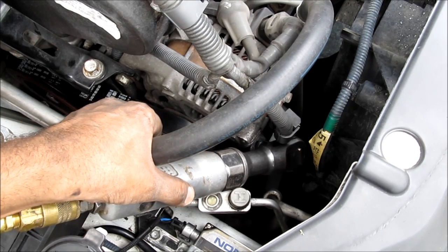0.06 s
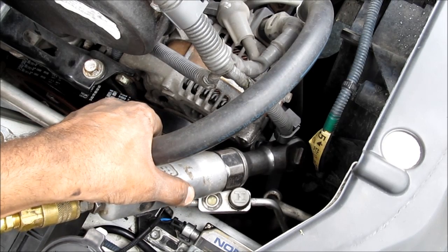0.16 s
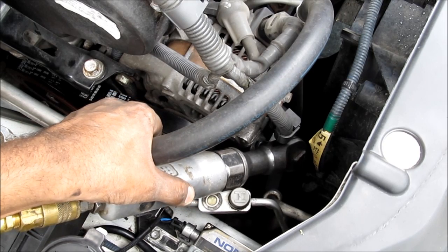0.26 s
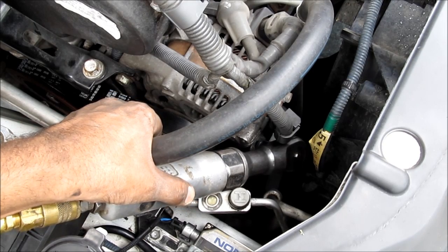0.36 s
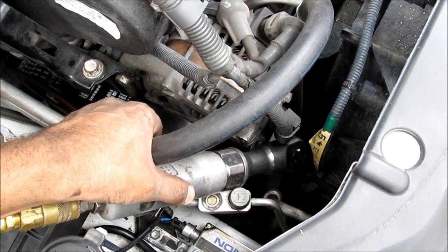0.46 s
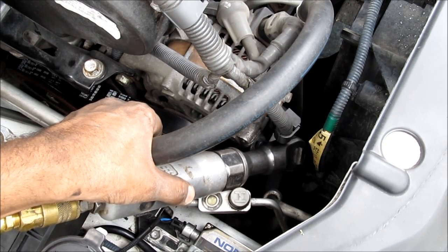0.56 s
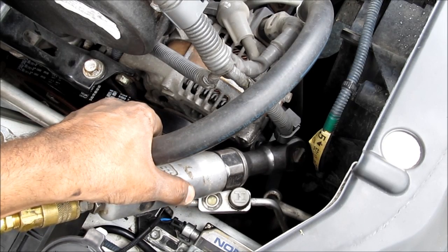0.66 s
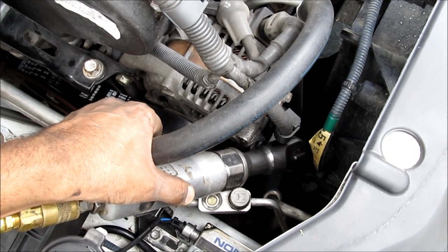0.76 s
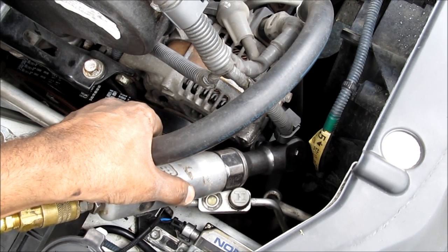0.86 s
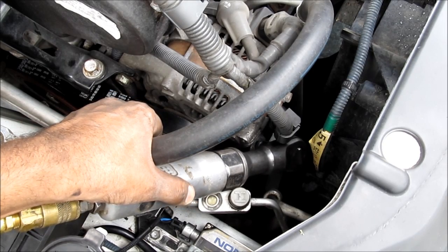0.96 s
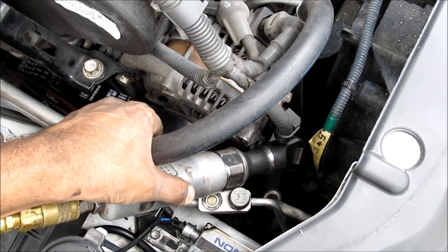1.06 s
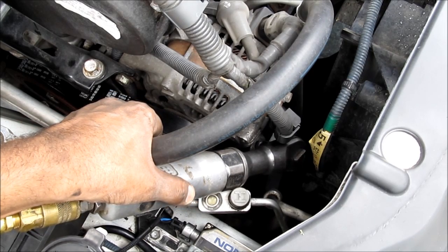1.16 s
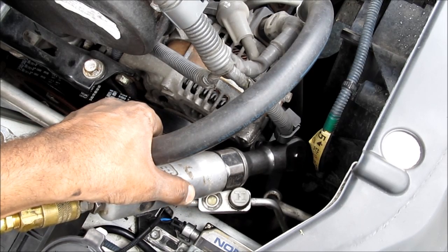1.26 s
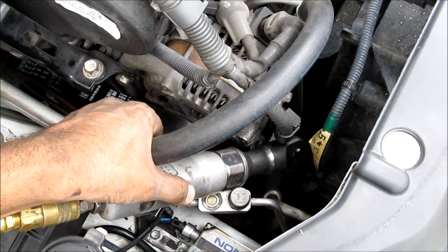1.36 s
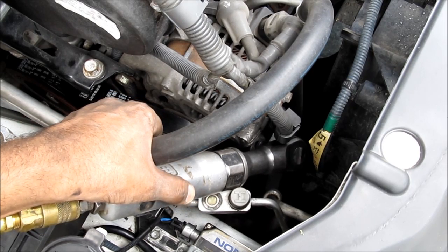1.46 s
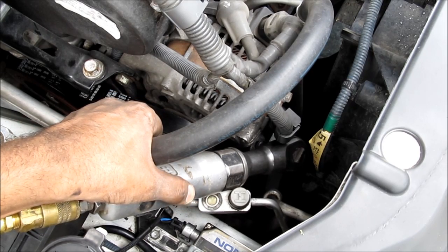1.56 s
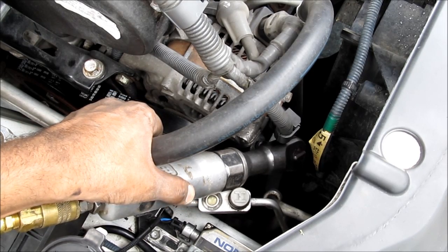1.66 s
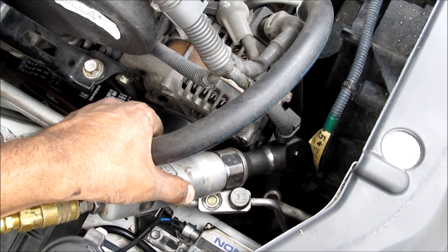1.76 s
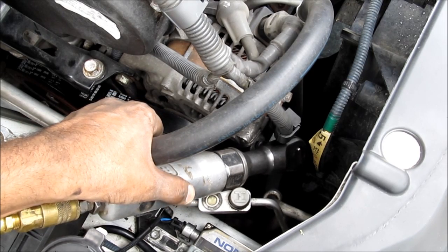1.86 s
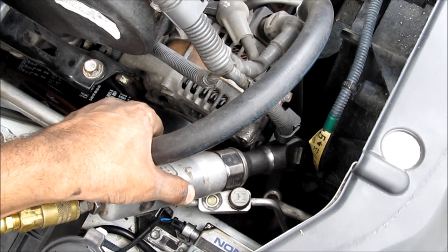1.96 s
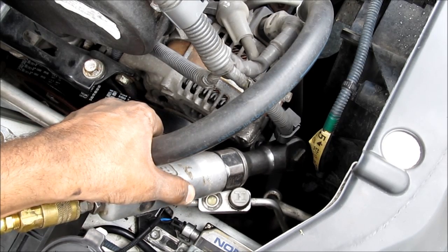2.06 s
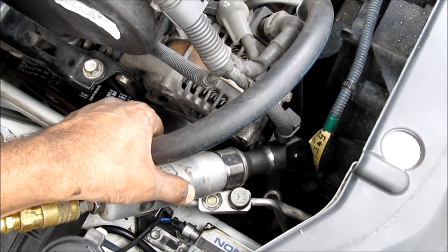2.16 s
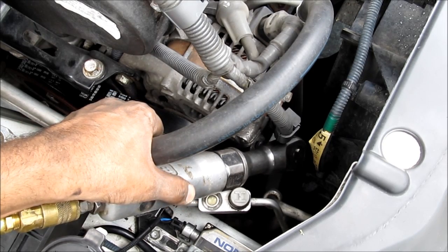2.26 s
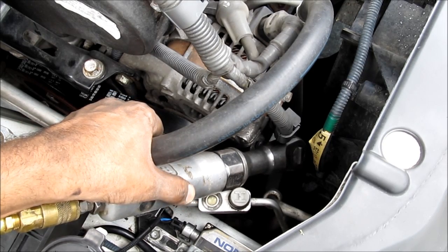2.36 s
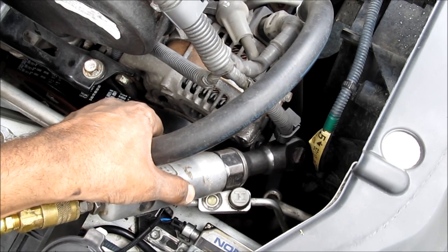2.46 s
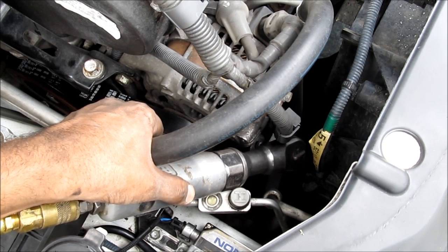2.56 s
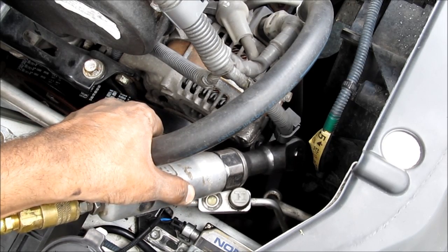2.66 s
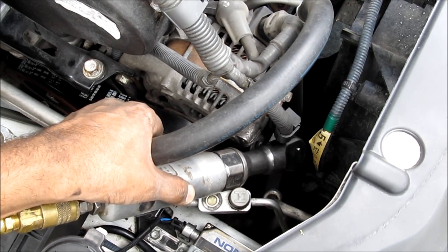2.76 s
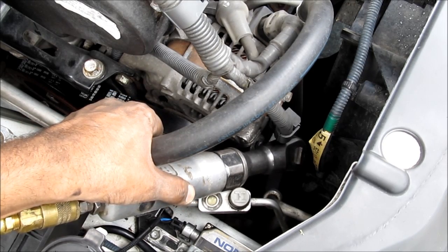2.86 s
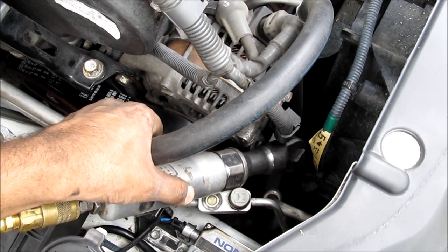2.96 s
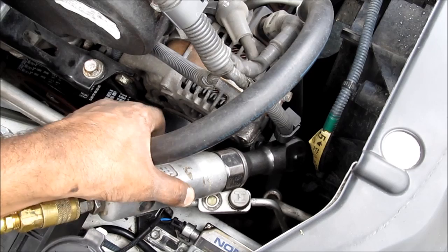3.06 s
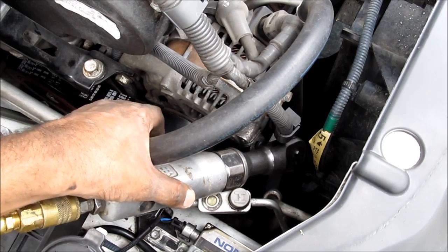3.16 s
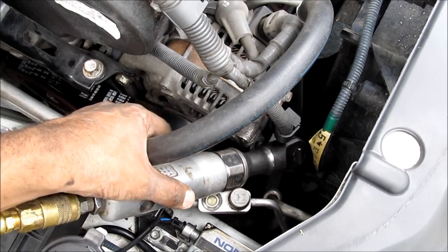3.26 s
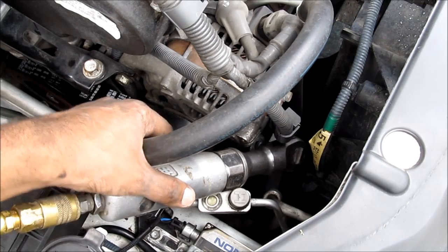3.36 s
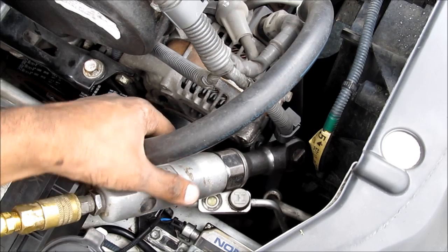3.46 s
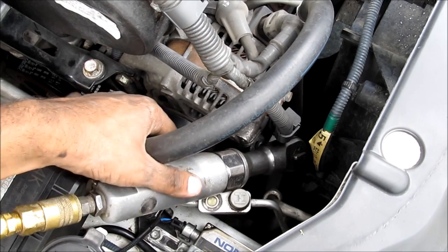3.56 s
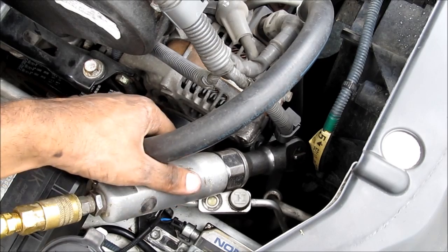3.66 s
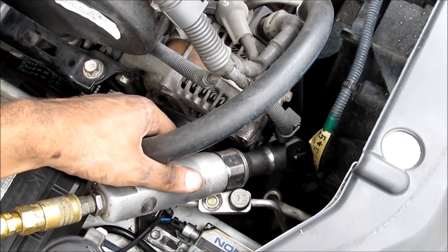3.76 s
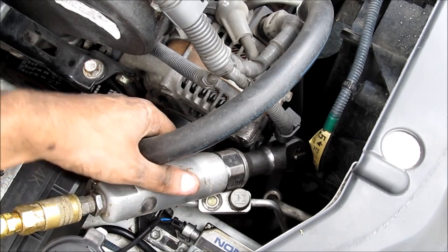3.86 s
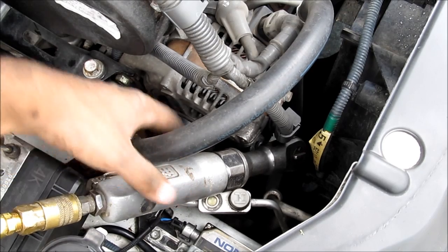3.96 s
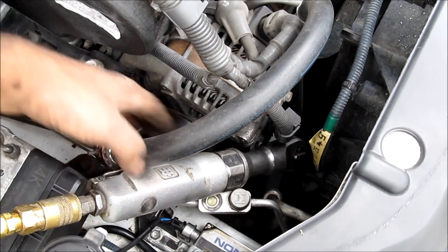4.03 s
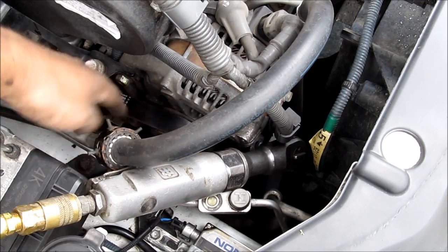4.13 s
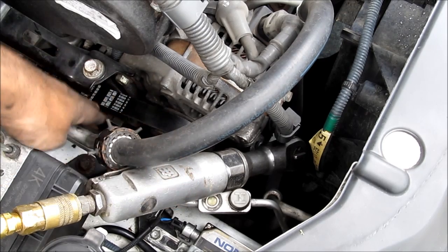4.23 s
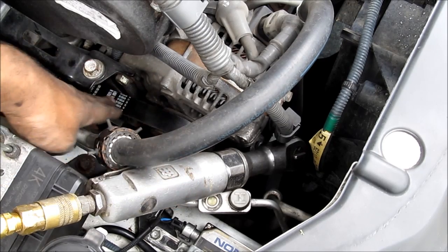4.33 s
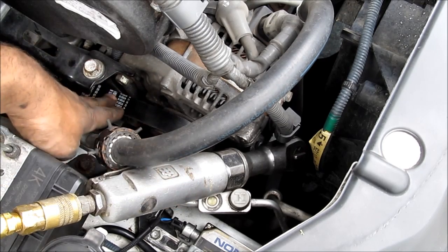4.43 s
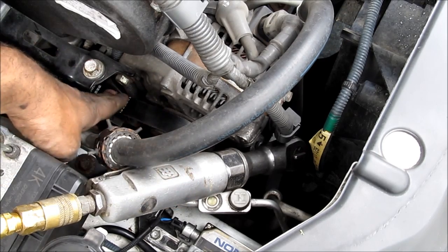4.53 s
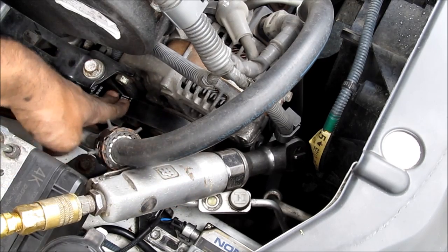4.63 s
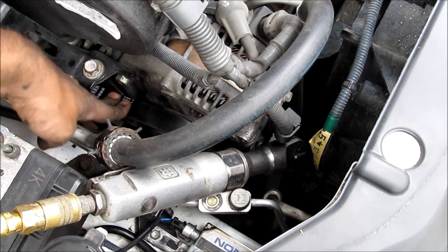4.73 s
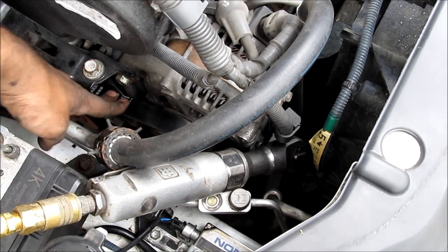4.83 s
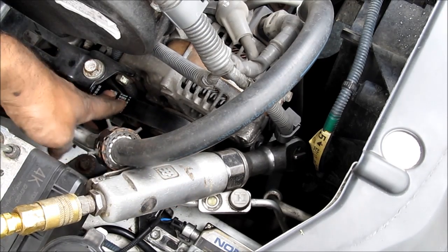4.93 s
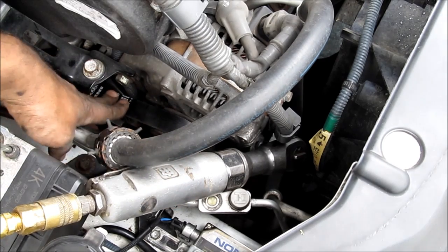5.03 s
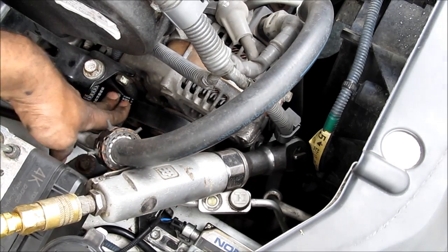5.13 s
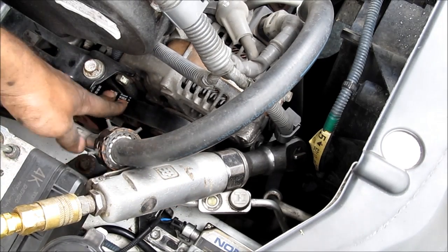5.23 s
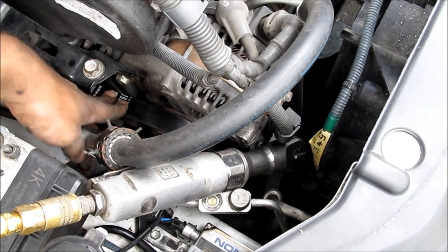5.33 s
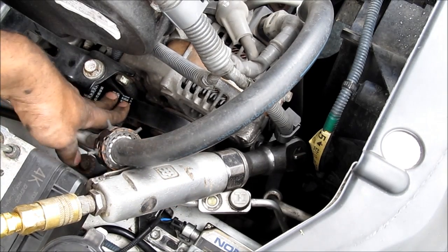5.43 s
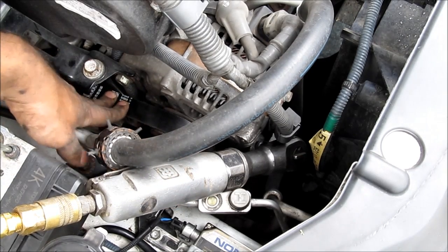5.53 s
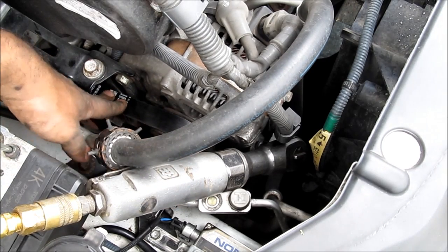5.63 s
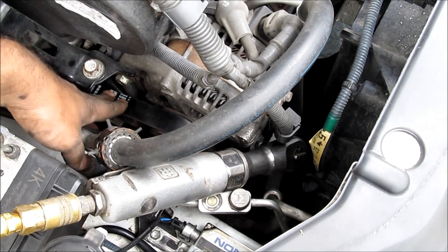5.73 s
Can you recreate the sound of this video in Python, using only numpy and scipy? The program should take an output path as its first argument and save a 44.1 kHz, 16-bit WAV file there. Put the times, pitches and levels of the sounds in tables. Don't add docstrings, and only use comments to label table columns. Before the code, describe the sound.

From 0 to about 3.4 s an air ratchet runs at full speed very near a small stereo microphone in an engine bay: a loud, bright, wide hiss of exhaust air, a steady whine around 1 kHz with higher overtones, and a rapid rattling chatter of gear and pawl. The pitch settles slightly at the start and sags a little from 3.1 s. At about 3.45 s the air is cut; the whine plunges into a short hollow whoop near 3.55 s, stalls by 3.6 s, and metal parts clatter until 3.7 s. Then it is very quiet, with low distant traffic and air gradually rising. A faint cricket chirps at 3.85, 4.2, 4.5, 5.05, 5.3 and 5.7 s, growing louder, among thin wavering whistles. Small ticks come at 3.8 and 4.2 s, a dry hand brush at 4.9-5.0 s, and knocks at 5.2 and 5.4 s.

```python
import sys
import numpy as np
from scipy import signal
from scipy.fft import rfft, irfft, next_fast_len
from scipy.io import wavfile
from scipy.ndimage import uniform_filter1d

SR = 44100
rng = np.random.default_rng(int(sys.argv[2]) if len(sys.argv) > 2 else 0)


def bounce(signal):
    frames = np.transpose(np.atleast_2d(signal))
    limited = np.clip(frames, -1, 1)
    pcm = np.round(limited * 32767).astype(np.int16)
    wavfile.write(sys.argv[1], SR, pcm)


def voltage_ratio(level):
    return 10 ** (np.asarray(level, float) / 20)


N = 255339
T = np.arange(N) / SR
HZ = np.fft.rfftfreq(512, 1 / SR)
FRAME_S = np.arange(N // 128 + 5) * 128 / SR


def evened(x):
    return x / np.sqrt(np.mean(x ** 2) + 1e-20)


def read(points, hz):
    f, value = np.transpose(points)
    return np.interp(np.log(hz + 1), np.log(f + 1), value)


def columns(rows, t):
    s, *rest = np.transpose(rows)
    return [np.interp(t, s, c) for c in rest]


def ramp(t, start, length):
    return np.clip((t - start) / length, 0, 1)


def bumps(peaks, hz):
    return sum(db / (1 + (2 * (hz - f) / width) ** 2) for f, width, db in peaks)


def coloured(x, db_at):
    size = next_fast_len(N)
    gain = voltage_ratio(db_at(np.fft.rfftfreq(size, 1 / SR)))
    return irfft(rfft(x, size) * gain, size)[:, :N]


def resonate(x, hz, width):
    pole = np.exp((2j * np.pi * hz - np.pi * width) / SR)
    return 2 * signal.lfilter([1 - abs(pole)], [1, -pole], x + 1e-18).real


def drift(rate, t):
    s = t[::1 + len(t) // 8000]
    rates = np.geomspace(.03, 1, 24) * rate
    waves = sum(np.sin(2 * np.pi * (f * s + rng.random())) / f ** .3 for f in rates)
    return np.interp(t, s, evened(waves))


def panned(x, left_db):
    return x * voltage_ratio(np.array([[left_db / 2], [-left_db / 2]]))


def pair(count, same):
    a, b = rng.standard_normal((count, 2)).T
    return np.array([a, same * a + np.sqrt(1 - np.clip(same, 0, 1) ** 2) * b])


def noise(db, same, patchy_db, left_db=0, lead=0):
    a, b, c, d, patches = rng.standard_normal((len(FRAME_S), len(HZ), 5)).T
    patches = uniform_filter1d(patches, size=6, axis=0)
    patches = evened(uniform_filter1d(patches, size=24, axis=1))
    same = np.clip(read(same, HZ), -1, 1)[:, None]
    left = a + 1j * b
    right = same * left * np.exp(-1j * lead) + np.sqrt(1 - same ** 2) * (c + 1j * d)
    z = np.array([left * voltage_ratio(left_db / 2), right / voltage_ratio(left_db / 2)])
    z = z * voltage_ratio(db + patchy_db * patches)
    return signal.istft(z, nperseg=512, noverlap=384)[1][:, :N] / np.sqrt(113)


# (time [s], vane rate [Hz])
SPEED = [
    (0, 1050),
    (.2, 1038),
    (.45, 1030),
    (1.05, 1021),
    (2.88, 1019),
    (3.23, 993),
    (3.42, 985),
]
# (time [s], vane rate [Hz], first order level [dB])
STALL = [
    (3.46, 978, -47),
    (3.49, 873, -62),
    (3.51, 781, -37),
    (3.522, 657, -42),
    (3.535, 522, -21.5),
    (3.56, 382.6, -20.5),
    (3.567, 367, -32),
    (3.581, 319.3, -29),
    (3.61, 310, -66),
]


def motor():
    vane_hz = columns(SPEED + [row[:2] for row in STALL], T)[0]
    return np.cumsum(vane_hz * (1 + .002 * drift(40, T))) / SR


# (time [s], level [dB])
FLOW = [(0, -20.5), (3.1, -20.5), (3.42, -22.5), (3.5, -25), (3.53, -30), (3.56, -38.5), (3.58, -38.5),
        (3.6, -52.5), (3.63, -63.5), (3.67, -60), (3.72, -81)]


def air_flow(t):
    flow_db = columns(FLOW, t)[0]
    lost_db = np.maximum(-23.5 - flow_db, 0)
    body_db = flow_db - 23.5 + np.minimum(2.5 * lost_db, 25)
    top_db = flow_db - .42 - np.minimum(1.5 * lost_db, 7.5)
    return flow_db, body_db, top_db


# (frequency [Hz], level [dB per Hz])
HISS = [(35, -63.5), (60, -46.5), (329, -18.5), (937, -12), (1000, -8.5), (1210, -13.5), (1970, -8.5),
        (2170, -10), (3000, -5.5), (3700, -7.5), (4060, -9.5), (4460, -8.5), (7800, -4.5), (10300, -4.5),
        (15700, -12.5)]
# (frequency [Hz], width [Hz], level [dB])
HOUSING = [(376, 106, 6.5), (792, 60, 3.5), (1295, 62, 5), (2970, 250, 0.5), (4155, 150, 5),
           (5560, 126, 3.5)]
# (frequency [Hz], width [Hz], level [dB])
RIPPLE = [(6790, 150, 2.5), (8260, 150, 2), (9130, 200, 2), (9570, 150, 2.5), (9900, 120, -2),
          (10085, 120, 2.5), (10250, 100, -1.5), (10430, 150, 2), (10800, 140, -2.5), (11035, 200, 4),
          (11400, 250, -3), (11720, 100, 2.5), (11950, 180, -3), (12330, 120, -2), (12570, 250, 3),
          (12800, 120, -2), (15330, 200, 3), (15650, 250, -3)]
# (frequency [Hz], width [Hz], gain [dB per dB of lost flow])
LASTING = [(8900, 1300, .78), (2600, 1800, .45)]
# (frequency [Hz], likeness [0-1])
NEAR_SAME = [(60, .9), (290, 1), (640, 0.91), (1400, 0.74), (3100, 0.74), (6000, 0.27), (9000, 0.554),
             (10500, .65), (15000, 0.34)]
# (frequency [Hz], left-right level [dB])
NEAR_LEFT = [(60, -1.5), (130, 0), (290, 1), (640, -1), (1410, 1), (3100, 0), (6820, 2.5), (15000, 3.5)]
# (frequency [Hz], left leads by [radians])
NEAR_LEAD = [(0, -0.5), (4130, 0.53), (6120, 0.5), (6720, 0.07), (9470, 1.2), (9820, -1), (10400, 0.9),
             (11000, -1.5), (11600, 4.5), (12300, 6), (13800, 12.5), (14600, 10), (14900, 9.5),
             (15400, 8.5)]


def exhaust(vane):
    flow_db, body_db, top_db = air_flow(FRAME_S)
    shape = read(HISS, HZ) + bumps(HOUSING + RIPPLE, HZ)

    def levelled(lo, hi):
        inside = (HZ > lo) & (HZ < hi)
        return shape - 10 * np.log10(np.mean(voltage_ratio(2 * shape) * inside))

    low = 1 / (1 + (HZ / 1300) ** 4)
    high = 1 / (1 + (9500 / (HZ + 1)) ** 12)
    middle = 1 - low - high
    field = np.outer(middle, flow_db + 0.28 * drift(6, FRAME_S))
    field += np.outer(low, body_db + 0.77 * drift(12, FRAME_S))
    field += np.outer(high, top_db + .45 * drift(12, FRAME_S))
    spectrum = middle * levelled(1500, 9500) + low * levelled(600, 900) + high * levelled(9500, 15500)
    field += spectrum[:, None]
    field += bumps([(10350, 450, 4.5)], HZ[:, None]) - 1.2
    ringing_db = np.clip(-20.0 - flow_db, 0, 14) - np.clip(.3 * (-42.5 - flow_db), 0, 6)
    field += np.outer(bumps(LASTING, HZ) - .3, ringing_db)
    field += .5 * drift(14, FRAME_S)
    hiss = noise(field, NEAR_SAME, 0.76, read(NEAR_LEFT, HZ)[:, None], read(NEAR_LEAD, HZ)[:, None])
    return hiss * (1 + 0.045 * np.cos(2 * np.pi * vane))


# (multiple of vane rate, level against air flow [dB], left-right [dB])
WHINE = [(3, -23.5, -0.5), (4, -19.5, 2.5), (5, -20, 3), (6, -20, 5.5), (1.25, -38, 0.5), (1.5, -31, -2),
         (1.75, -38.5, -0.5), (2.25, -29, -2)]


def whine(vane):
    coast_s = SPEED[-1][0]
    coasting = ramp(T, coast_s, STALL[0][0] - coast_s)
    steady = T < 3.47
    alive = np.clip((3.66 - T) / .02, 0, 1)

    running_db = -36 - 0.9 * T
    first_db = running_db + coasting * (columns(STALL, T)[1] - running_db)
    first_db += 0.87 * steady * drift(30, T)
    first = np.sqrt(2) * voltage_ratio(first_db) * alive * np.sin(2 * np.pi * vane)
    out = panned(first - 0.44 * resonate(first, 395, 22), .4)

    second_db = -42 + 1.1 * (1 - coasting) * drift(2.5, T) - 480 * np.maximum(T - 3.558, 0)
    second_db += 4.5 * ramp(T, 3.51, .012)
    second_db -= 9 * (ramp(T, 3.24, .03) - ramp(T, 3.24 + .22, .02))
    second_db += 2.6 * steady * drift(45, T)
    out += panned(np.sqrt(2) * voltage_ratio(second_db) * alive * np.sin(2 * np.pi * (2 * vane + 0.33)), 4.1)

    flow_db = air_flow(T)[0]
    for order, db, left_db in WHINE:
        level = np.sqrt(2) * voltage_ratio(flow_db + db + 3.2 * drift(30, T))
        out += panned(level * np.sin(2 * np.pi * (order * vane + rng.random())), left_db)
    return out


# (multiple of crank rate, level [dB])
SHAKE = [(2, -67.5), (3, -63.5), (4, -64.5), (5, -65.5), (6, -61.5), (7, -61), (9, -57), (10, -65),
         (11, -58.5), (12, -58.5), (14, -71.5), (17, -54.5)]
# (place in the turn [0-1], ring [Hz], width [Hz], level [dB], decay [s])
BLOWS = [
    (.33, 2420, 1500, -30.5, 0.0027),
    (0.01, 8340, 1600, -24.5, 0.0019),
    (0.3, 7100, 2400, -30.5, 0.0012),
    (0.9, 3000, 1600, -35, .002),
]


def crank(vane):
    turn = vane / 22.2 + .1
    out = np.zeros(N)
    for order, db in SHAKE:
        out += voltage_ratio(db + 2.5 + 2.6 * drift(8, T)) * np.sin(2 * np.pi * (order * turn + rng.random()))
    out = panned(out, 0)
    out += .2 * np.roll(out, 90, axis=1) * [[1], [-1]]
    for place, hz, width, db, decay in BLOWS:
        hit = np.diff(np.floor(turn - place), prepend=0) > 0
        sizes = hit * voltage_ratio(3.5 * rng.standard_normal(N))
        envelope = signal.lfilter([1], [1, -np.exp(-1 / (decay * SR))], sizes)
        ring = resonate(resonate(pair(N, 1.0), hz, width), hz, width)
        out += voltage_ratio(db) * envelope * evened(ring)
    return out * voltage_ratio(air_flow(T)[0] + 21.0)


# (frequency [Hz], level [dB per Hz])
YARD = [(12, -43.5), (20, -20.5), (130, 0), (202, -7.5), (406, -9.5), (552, -15), (690, -15.5), (1430, -21),
        (2710, -24), (2940, -23.5), (3380, -24), (4600, -26), (6080, -30), (11500, -29), (15700, -34)]
# (frequency [Hz], likeness [-1 to 1])
FAR_SAME = [(60, 0.95), (150, 0.94), (380, 0.82), (950, 0.5), (2380, -0.18), (5980, -0.34), (15000, 0.24)]


def yard():
    ducked = 1 - ramp(FRAME_S, 3.45, .1)
    level_db = -60 - 6.5 * ducked + 4.5 * np.maximum(FRAME_S - 4.48, 0)
    treble_db = -.5 - 3.5 * (1 - ramp(FRAME_S, 3.72, .8))
    field = level_db + np.outer(HZ / (HZ + 400), treble_db) + 0.67 * drift(8.7, FRAME_S)
    air = coloured(noise(field, FAR_SAME, 0.87), lambda hz: read(YARD, np.minimum(hz, 13500)) + 22)
    deep = coloured(air, lambda hz: -20 * np.log10(1 + (hz / 75) ** 4))
    deep_db = -3.5 * np.interp(T, FRAME_S, ducked) + 4 * drift(9, T)
    return air + deep * (voltage_ratio(deep_db) - 1)


def rattle(s, hz, width, db, decay, left_db):
    out, t = np.zeros((2, N + 4000)), np.arange(4000) / SR
    ring = resonate(resonate(pair(len(t), .6), hz, width), hz, width)
    ring = evened(resonate(ring, hz, 2 * width))
    envelope = np.exp(-t / decay) * np.minimum(t / .0009, 1)
    at = round(s * SR)
    out[:, at:at + len(t)] = panned(voltage_ratio(db) * ring * envelope, left_db)
    return out[:, :N]


PARTS = {"muffler": (393, 76, .011), "yoke": (2500, 1700, .004), "housing": (2250, 950, .0084),
         "spring": (8300, 2100, .0034), "tip": (12500, 2000, .0024)}
# (time [s], part, level [dB], left-right [dB])
RATTLES = [(3.582, "muffler", -27, 0), (3.613, "yoke", -40.5, 1), (3.623, "housing", -47, -1),
           (3.647, "spring", -59, -2), (3.657, "yoke", -53.5, 1), (3.6605, "spring", -49, 1.5),
           (3.664, "spring", -40, 7), (3.664, "yoke", -44, 5), (3.665, "tip", -54, 0),
           (3.681, "yoke", -42, 0), (3.692, "housing", -54, 1)]


def settling_head():
    out = np.zeros((2, N))
    for s, part, db, left_db in RATTLES:
        hz, width, decay = PARTS[part]
        out += rattle(s, hz, width, db, decay, left_db)
    return out


# (time [s], ring [Hz], width [Hz], level [dB], decay [s])
CLICKS = [
    (3.722, 129.5, 60, -60, .016),
    (3.772, 4700, 1500, -64.5, .02),
    (4.168, 5030, 5980, -64, 0.0031),
    (5.192, 1650, 296, -56.5, 0.015),
    (5.388, 2390, 900, -52, 0.0037),
    (5.45, 7500, 1006, -65, .006),
]


def hand_knocks():
    return sum(rattle(*row, left_db=2) for row in CLICKS)


# (start [s], end [s], frequency [Hz], glide [Hz per s], level [dB])
WHISTLES = [(3.78, 3.845, 2950, 0, -67), (3.785, 3.83, 5380, 0, -62), (3.76, 3.83, 2200, 900, -74),
            (3.98, 4.345, 2040, 330, -76), (4.36, 4.415, 2900, 0, -67), (4.445, 4.97, 3030, 10, -76),
            (4.97, 5.49, 3030, 0, -74), (5.18, 5.23, 2930, 0, -65), (4.665, 4.7, 2900, 0, -71),
            (5.29, 5.33, 2950, 0, -70), (5.575, 5.695, 2500, 0, -68), (5.655, 5.77, 8120, 0, -73),
            (4.05, 4.09, 4380, 0, -79), (4.44, 4.54, 8150, 0, -79), (4.84, 4.89, 8150, 0, -77),
            (4.46, 4.55, 7400, 0, -80), (5.14, 5.32, 8250, 0, -79), (5.56, 5.64, 8200, 2500, -77),
            (5.15, 5.785, 5330, 0, -78.5), (5.03, 5.1, 7400, 0, -79), (5.47, 5.66, 4450, -200, -79),
            (5.7, 5.78, 1700, 0, -72)]


def whistles():
    out = np.zeros((2, N))
    for start, end, hz, glide, db in WHISTLES:
        t = np.arange(0, end - start, 1 / SR)
        throbs_per_s = max(9.5, 1 / t[-1])
        swell = signal.windows.tukey(len(t), .03 / t[-1])
        swell = swell * (1 - .5 * np.cos(2 * np.pi * throbs_per_s * t)) * voltage_ratio(1.3 * drift(30, t))
        turns = np.cumsum(hz + glide * t + 22 * drift(120, t)) / SR
        fuzz = 1 + .35 * evened(uniform_filter1d(pair(len(t), .5), size=220, axis=1))
        tone = np.sin(2 * np.pi * (turns + rng.random((2, 1)) / 4))
        at = round(start * SR)
        out[:, at:at + len(t)] += voltage_ratio(db + 1) * swell * fuzz * tone
    return out


# (time [s], peak level [dB])
CHIRPS = [
    (3.8511, -63.5),
    (4.1647, -63),
    (4.4964, -62),
    (5.052, -58.5),
    (5.3323, -57.5),
    (5.6714, -55),
]


def cricket():
    out, t = np.zeros(N + SR), np.arange(round(.042 * SR)) / SR
    for s, db in CHIRPS:
        for k, stroke_db in enumerate([-3.0, -1.0, -1, -10]):
            stroke = np.sin(2 * np.pi * (4850 * t - 7500 * t ** 2 + rng.random()))
            stroke *= np.sin(np.pi * np.minimum(t / .023, 1)) ** 1.5
            tail = np.sin(2 * np.pi * (4600 * t - 2500 * t ** 2 + rng.random()))
            stroke += 0.312 * tail * np.sin(np.pi * t / t[-1]) ** 2
            at = round((s - .003 + .0405 * k) * SR)
            out[at:at + len(t)] += voltage_ratio(db + stroke_db + rng.normal(0, 1.18)) * stroke
    echoes = np.array([np.roll(out, lag)[:N] for lag in (900, 909)])
    return panned(out[:N], .6) + .6 * echoes


def hand_brush():
    start, rise = 4.885, .035
    stroke = ramp(FRAME_S, start, rise) - ramp(FRAME_S, 5.012, .022)
    stroke_db = -63 + 35 * np.clip(FRAME_S - start - rise, 0, .1) - 35 * (1 - stroke)
    shape = read([(300, -9.0), (1000, 4), (3500, 5.0), (8000, 1), (15000, -8.5)], HZ)
    return noise(shape[:, None] + stroke_db + 1.77 * drift(120, FRAME_S), FAR_SAME, 2.5)


def scene():
    vane = motor()
    tool = exhaust(vane) + whine(vane) + crank(vane)
    tool = coloured(tool, lambda hz: -10 * np.log10(1 + (85 / (hz + 1)) ** 8))
    hand = hand_knocks() + hand_brush()
    return tool + yard() + settling_head() + hand + whistles() + cricket()


def low_pass(x):
    return signal.sosfilt(signal.butter(12, 15840, fs=SR, output="sos"), x)


# (frequency [Hz], width [Hz], level [dB])
NOTCHES = [(7830, 150, -8), (14900, 250, -5)]


def record(dry):
    mix = coloured(dry, lambda hz: bumps(NOTCHES, hz))
    return low_pass(mix)


dry = scene()
out = record(dry)
bounce(out)
```